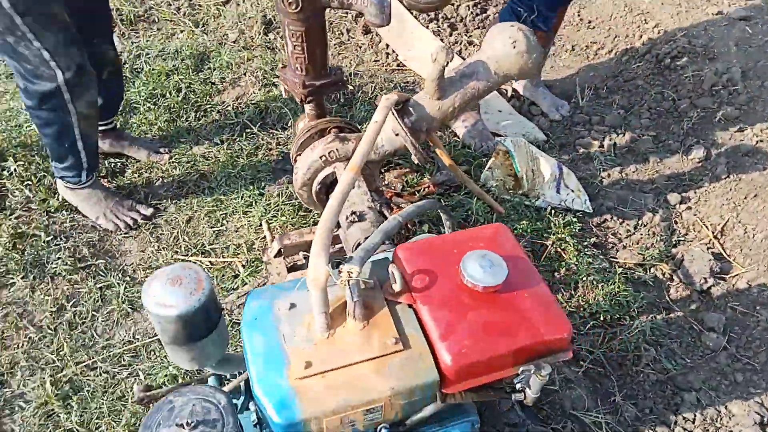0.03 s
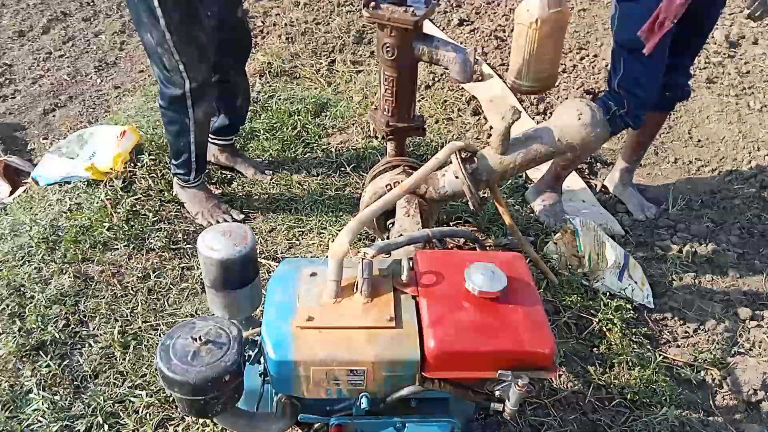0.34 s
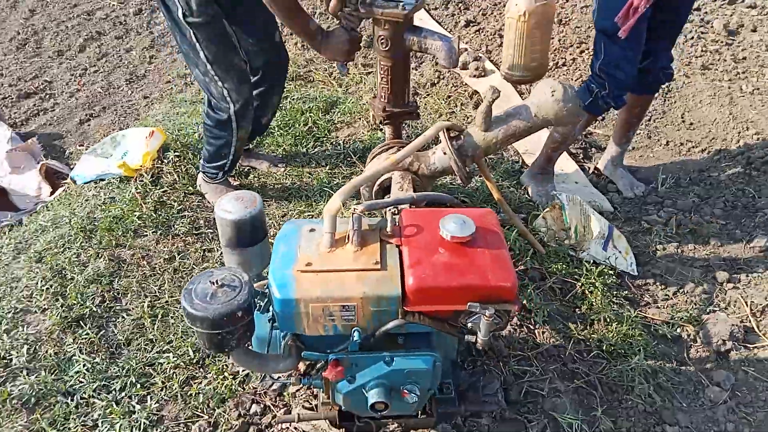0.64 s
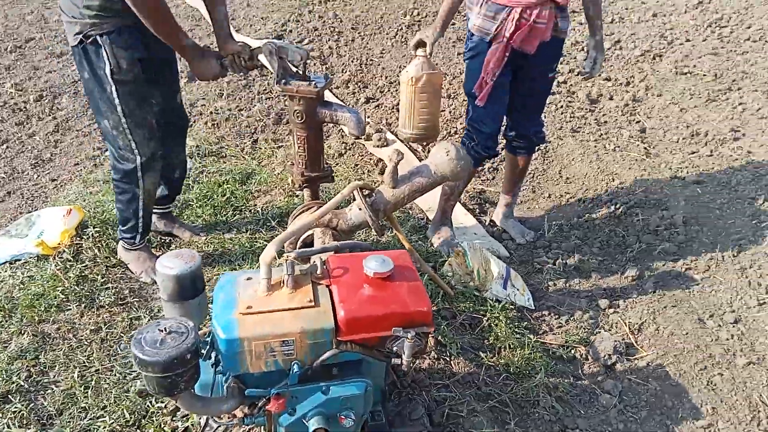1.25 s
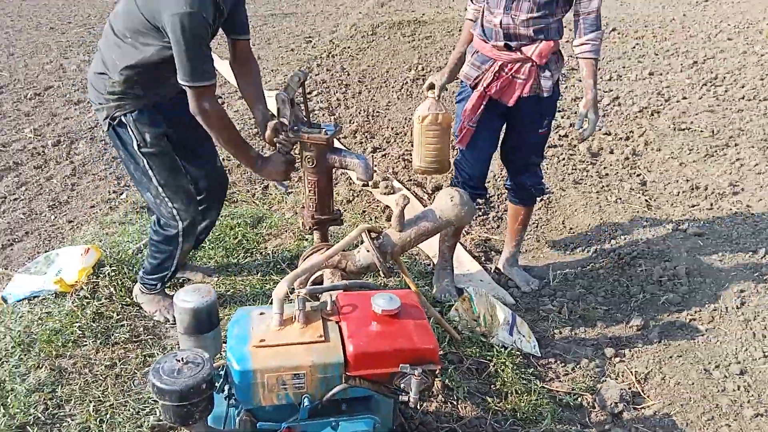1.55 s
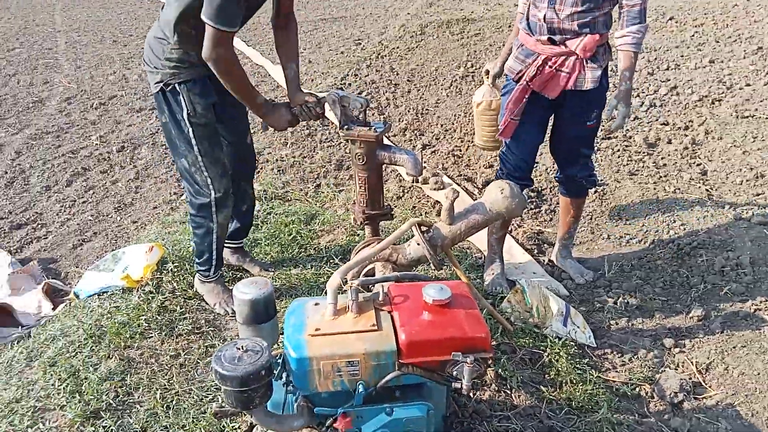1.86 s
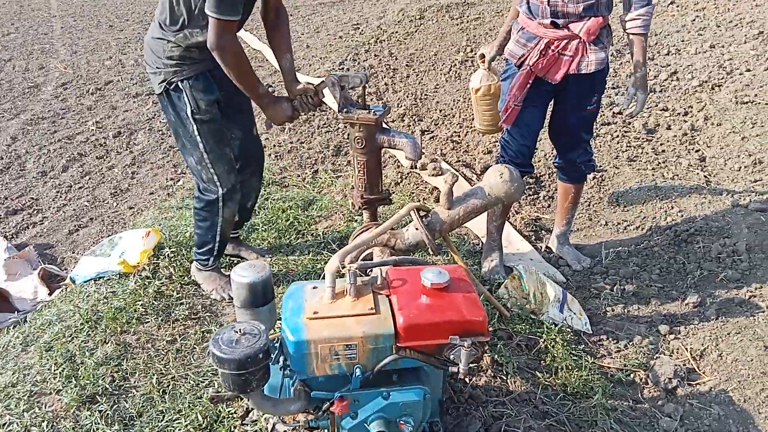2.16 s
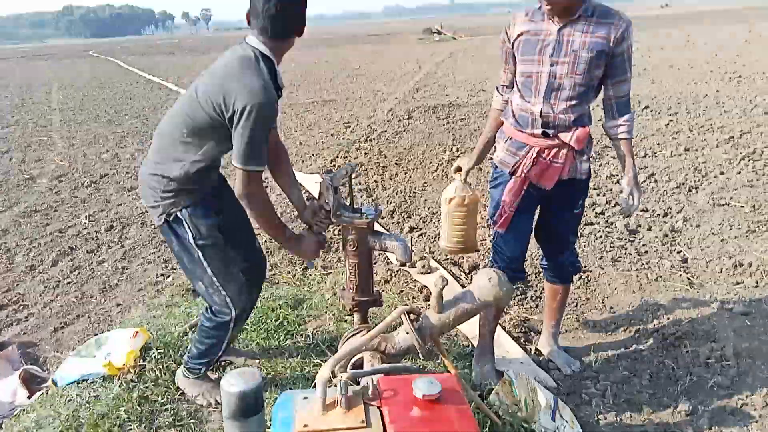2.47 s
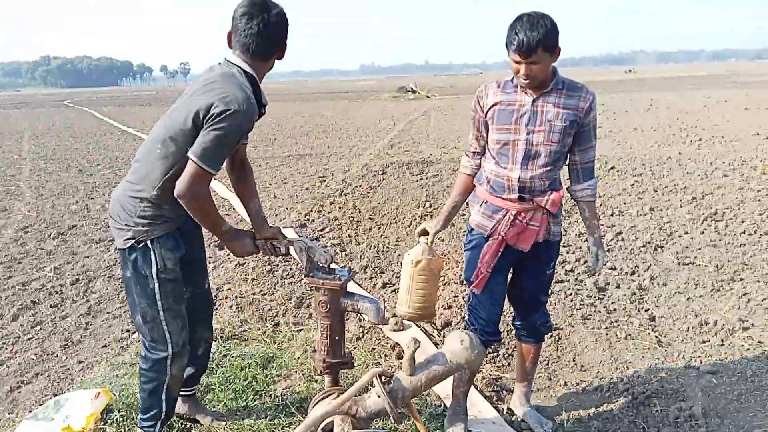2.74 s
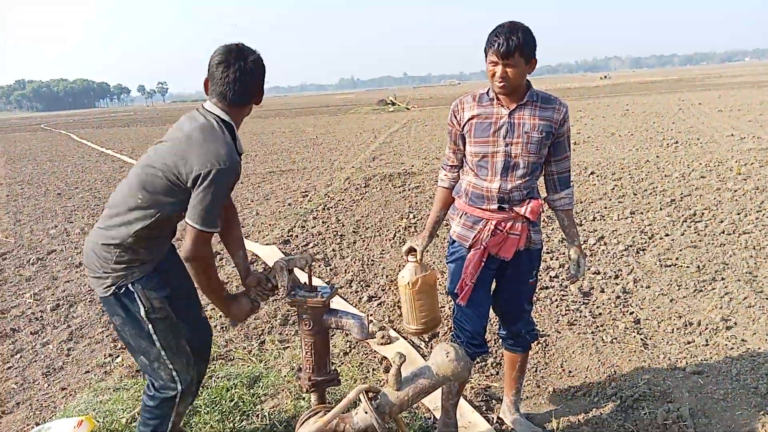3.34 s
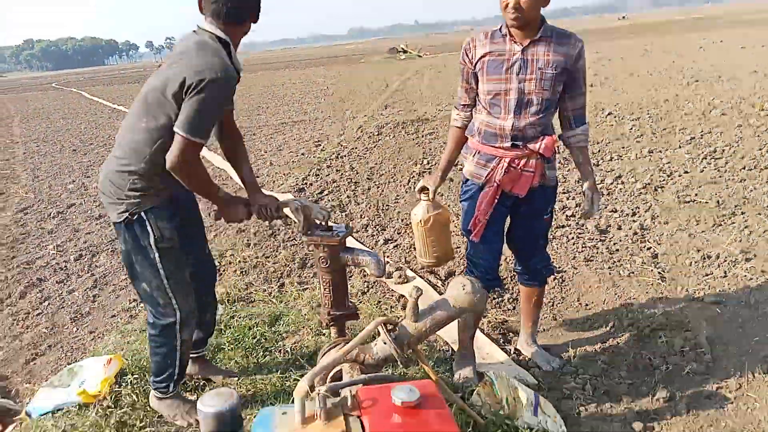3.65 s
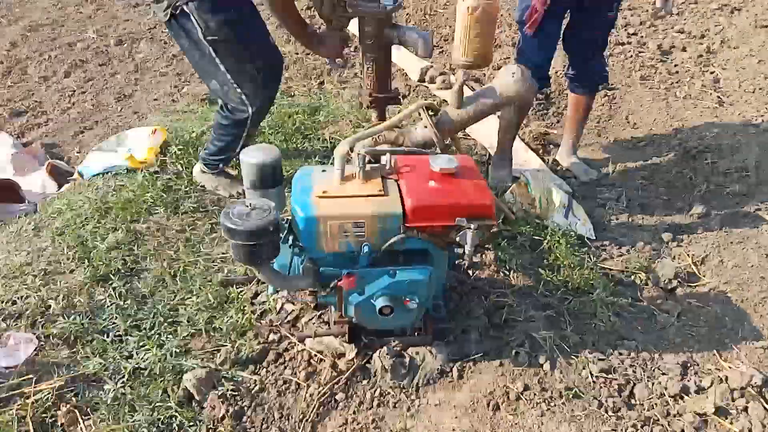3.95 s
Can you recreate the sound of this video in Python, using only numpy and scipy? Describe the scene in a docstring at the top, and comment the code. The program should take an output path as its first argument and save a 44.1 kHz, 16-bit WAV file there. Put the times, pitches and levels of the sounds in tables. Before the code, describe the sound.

A rusty hand pump clanks and squeaks in rhythm, with an engine thumping faintly far off.

```python
"""Loose pins clank close by: a rusty cast-iron hand pump, worked about twice a second in an open field.
Rust scrapes through the iron, the air in the barrel gulps at a pitch that follows the piston,
the dry pivot squeaks and the washer groans on the barrel wall.
Far off a single-cylinder engine thumps, and a little wind touches the microphone."""
import sys
import numpy as np
from scipy.fft import rfft, irfft, next_fast_len
from scipy.io import wavfile
from scipy.ndimage import map_coordinates

SR = 44100
rng = np.random.default_rng(int(sys.argv[2]) if len(sys.argv) > 2 else 0)


def generate_wav(signal):
    """Clip the signal to [-1, 1] and save it as 16-bit WAV at the path in sys.argv[1]."""
    frames = np.transpose(np.atleast_2d(signal))
    scaled = np.clip(frames, -1, 1) * 32767
    pcm = np.round(scaled).astype(np.int16)
    wavfile.write(sys.argv[1], SR, pcm)


N = 176400
T = np.arange(N) / SR


def amp(db):
    return 10 ** (np.asarray(db) / 20)


def unit(x):
    return x / np.sqrt(np.mean(x ** 2) + 1e-20)


def curve(points, at=T):
    return np.interp(at, *np.transpose(points))


def gain(colour, hz):
    """Gain at hz from (f/Hz, level/dB) points, joined on a log frequency axis."""
    f, db = np.transpose(colour)
    return amp(np.interp(np.log(hz + 1), np.log(f + 1), db))


def wobble(rate):
    """A smooth random curve, rate knots a second."""
    knots = rng.standard_normal(N // 64)
    return np.interp(T, T[::16], map_coordinates(knots, [T[::16] * rate + 2], order=2))


def filtered(x, response):
    """x through a complex frequency response."""
    size = next_fast_len(N + SR // 2)
    return irfft(rfft(x, size) * response(np.fft.rfftfreq(size, 1 / SR)), size)[:N]


def noise(colour):
    """Coloured noise of rms 1."""
    return unit(filtered(rng.standard_normal(N), lambda hz: gain(colour, hz)))


def swell(s, width):
    """A bell-shaped envelope around time s; width is its standard deviation in seconds."""
    return np.exp(-.5 * np.minimum(((T - s) / width) ** 2, 100))


def glide(s, hz, hz_per_s, waver):
    """Phase of an unsteady stick-slip tone gliding through hz at time s."""
    return 2 * np.pi * np.cumsum((hz + hz_per_s * (T - s)) * (1 + waver)) / SR


def over_stroke(points):
    """Repeats (share of the stroke, value) points with every stroke of the handle."""
    # the piston turns round at the low-pitched end of its stroke: t/s
    turns = [-.38, .07, .53, .97, 1.44, 1.92, 2.39, 2.86, 3.35, 3.81, 4.27]
    share = np.interp(T, turns, np.arange(len(turns))) % 1
    return curve(points, share)


def iron(hz, pin_db, scatter_db=5):
    """The pump's response: distinct modes on a bed of dense ones, varied a little at each call."""
    # modes of body and handle: f/Hz, t60/s, relative level/dB
    body_modes = [(874, .07, -0.5), (991, 0.11, 4), (1403, 0.17, -6), (1736, 0.023, -12.5),
                  (1898, 0.13, 3.5), (1935, 0.2, 1), (2062, 0.036, -3.5), (2230, 0.094, 1),
                  (2406, 0.062, -6.5), (3211, 0.038, 1.5), (3416, 0.027, 3), (3790, 0.05, 5),
                  (4545, 0.069, -3.5)]
    # modes of the pins: f/Hz, t60/s, relative level/dB
    pin_modes = [(4995, 0.043, 3.7), (6237, 0.043, 4), (8850, 0.16, 11.5), (9050, 0.017, 3.4),
                 (10400, 0.046, 12), (12870, 0.068, 16)]
    # overall colour of the metal: f/Hz, level/dB
    colour = [(350, 2), (600, -15.5), (858, -7.5), (1160, -7), (1880, 1), (2760, -1.5), (3680, -2),
              (4400, -2.5), (4980, -6), (6200, -10), (7520, -21), (9240, -14), (9760, -16), (13400, -25),
              (16000, -30)]
    dense_bed, detune_hz, low_edge_hz = .6, 16, 420
    modes = 0
    for centre, t60, db in body_modes + [(f, t60, db + pin_db) for f, t60, db in pin_modes]:
        strength = amp(db + scatter_db * rng.normal())
        offset_hz = hz - centre - detune_hz * rng.normal()
        modes += strength / (1 + 2j * np.pi * offset_hz * t60 / np.log(1000))
    return (dense_bed + modes) * gain(colour, hz) / np.sqrt(1 + (low_edge_hz / (hz + 1)) ** 6)


def field_rush():
    """The low rush of the open field, all around the microphone."""
    # colour of the rush: f/Hz, level/dB
    colour = [(20, -17), (45, -9), (80, 9), (150, 0), (300, -3), (550, -21), (1000, -14), (3000, -22),
              (6000, -39.5), (10000, -41), (16000, -49)]
    # its slow rise and fall: t/s, level/dB
    levels = [(0, -28), (.3, -42.5), (.6, -41), (1.2, -41.5), (2.1, -41), (2.6, -45.5), (3.1, -41),
              (3.6, -43), (4, -42)]
    return amp(curve(levels) + 2.7 * wobble(6.27) + .87 * wobble(44)) * noise(colour)


def rubbing():
    """Rust scrapes in grains through the iron, hardest around the turn of the stroke."""
    # friction of piston and pins: share of the stroke, level/dB
    friction = [(0, -43), (.15, -52.5), (.3, -44), (.5, -60), (.62, -52.5), (.78, -45), (1, -42)]
    dull_hz = 3500
    grains = rng.standard_normal(N) * amp(4.5 * wobble(260) + 2.5 * wobble(35))
    scrape = filtered(grains, lambda hz: iron(hz, pin_db=-24, scatter_db=9) / (1 + 1j * hz / dull_hz))
    return amp(over_stroke(friction)) * unit(scrape)


def clanks():
    """Loose pins close by: each blow is a chatter of rusty contacts; the top treble peaks and dies first."""
    # blows: t/s, base rise/s, then level/dB before trim in each of the four registers, low to high
    blows = [(0.003, 0.0035, -66, -30.5, -46, -46), (0.021, 0.0054, -57, -30.5, -67, -49),
             (0.037, 0.003, -40, -32.5, -37, -32.5), (0.063, 0.0023, -65, -55, -33, -36),
             (0.074, 0.002, -57, -55, -48, -41), (0.085, 0.0024, -25.5, -18, -29.5, -28.5),
             (0.099, 0.004, -34, -43, -17.5, -36), (0.109, 0.0025, -30, -22, -30, -42),
             (0.394, 0.005, -22.5, -30.5, -20, -27.5), (0.407, 0.0067, -31, -18.5, -23, -25),
             (0.442, 0.0046, -50, -34, -31.5, -42), (0.488, 0.018, -36, -28, -36, -35.5),
             (0.518, 0.002, -53, -46, -57, -36), (0.549, 0.0034, -27, -27.5, -26, -48),
             (0.573, 0.0013, -31, -39, -41, -52), (0.597, 0.003, -31.5, -33.5, -29, -47.5),
             (0.822, 0.0079, -37, -38, -47, -67), (0.856, 0.005, -33, -35, -25.5, -25),
             (0.899, 0.0035, -58, -47, -36, -43), (0.911, 0.003, -37, -35, -32, -36.5),
             (0.939, 0.0061, -26.5, -27, -29, -30), (0.99, 0.011, -21, -20.5, -24, -27),
             (1.063, 0.0018, -36.5, -27.5, -32, -47), (1.28, 0.0074, -36, -40, -45, -68),
             (1.314, 0.0031, -32.5, -29.5, -30, -29.5), (1.351, 0.012, -37, -28, -34, -43),
             (1.38, 0.0042, -35, -51, -41, -42.5), (1.406, 0.0046, -34, -39, -37.5, -35),
             (1.456, 0.0017, -23, -26.5, -23.5, -30), (1.479, 0.0089, -55, -24, -21.5, -52),
             (1.721, 0.002, -50, -41.5, -47.5, -63), (1.778, 0.006, -29.5, -31, -23.5, -29),
             (1.823, 0.013, -39, -38.5, -28.5, -33.5), (1.876, 0.012, -30, -31, -27.5, -37),
             (1.93, 0.0049, -25, -25.5, -24, -28.5), (1.958, 0.006, -24.5, -45, -36, -76),
             (1.98, 0.0025, -56, -37, -32, -51), (2.072, 0.0019, -55, -46, -43.5, -66),
             (2.142, 0.0012, -50, -44.5, -53, -58.5), (2.197, 0.03, -31.5, -40, -43, -56),
             (2.247, 0.0064, -45, -28, -31.5, -35.5), (2.263, 0.0018, -37, -41, -31.5, -40),
             (2.304, 0.003, -41, -48, -46, -56), (2.343, 0.0045, -31, -41, -33, -34.5),
             (2.403, 0.0094, -23.5, -23.5, -22, -27), (2.432, 0.0013, -34, -28.5, -29.5, -45),
             (2.634, 0.00077, -66, -51, -46.5, -64), (2.682, 0.0057, -27, -33, -37, -56.5),
             (2.738, 0.0078, -26.5, -17.5, -17, -29.5), (2.834, 0.0093, -30, -29, -25.5, -34),
             (2.87, 0.0066, -33.5, -38, -32, -49), (2.889, 0.0069, -23.5, -22, -21.5, -24.5),
             (2.918, 0.0044, -27, -25, -23.5, -52), (3.178, 0.0053, -33.5, -25.5, -33.5, -64),
             (3.212, 0.011, -37, -32, -22.5, -36), (3.226, 0.002, -30, -24.5, -37, -53),
             (3.354, 0.0047, -27, -30.5, -32, -42), (3.378, 0.0087, -32.5, -33, -37, -79),
             (3.656, 0.0017, -38.5, -45, -45, -81), (3.686, 0.0067, -25.5, -19.5, -22, -26.5),
             (3.775, 0.009, -32.5, -32.5, -38, -37.5), (3.786, 0.003, -33, -34, -32, -61),
             (3.834, 0.0039, -25.5, -23.5, -23, -26.5), (3.877, 0.0044, -48, -32.5, -35.5, -55)]
    # registers of a clank: f/Hz, factor on the rise, chatter decay/s, trim/dB
    registers = [(970, 0.76, 0.017, -3.5), (1760, 1.13, 0.0082, -2.5), (3700, 0.91, 0.009, -3),
                 (9260, 0.62, 0.0065, -2)]
    # how strongly the pins ring: t/s, level/dB
    pin_ring = [(0, -23), (.9, 1.5), (1.8, -3.5), (2.5, -15.5), (3.2, -3.5), (3.8, -18)]
    uneven_db, uneven_hz, roughness = 4.5, 170, .58
    scrape_db, scrape_s, energy_s = -15.5, .0035, .021
    size, lead = SR // 3, SR // 30
    t, hz = np.arange(size) / SR, np.fft.rfftfreq(size, 1 / SR)
    centres = np.log([row[0] for row in registers])
    bands = [np.interp(np.log(hz + 1), centres, row) for row in np.eye(len(registers))]
    scrape = amp(scrape_db) * np.exp(-t[::-1] / scrape_s)  # wraps round to lead into the blow
    out = np.zeros(N + SR)
    for s, rise, *levels in blows:
        push, grain = rng.standard_normal((2, size))
        contacts = push * np.exp(roughness * grain)
        body = iron(hz, pin_db=curve(pin_ring, s))
        # each blow has its own patchy, uneven colour
        body *= amp(uneven_db * map_coordinates(rng.standard_normal(size), [hz / uneven_hz], order=1))
        for (_, factor, decay, trim_db), band, db in zip(registers, bands, levels):
            peak_s = rise * factor
            envelope = np.minimum(t / peak_s, 1) ** .72 * np.exp(-np.maximum(t - peak_s, 0) / decay)
            force = np.roll(contacts * (envelope + scrape), lead)
            ring = irfft(rfft(force) * body * band, size)
            ring *= np.sqrt(SR * energy_s) / np.linalg.norm(ring)
            out[round(s * SR):][:size] += amp(db + trim_db) * ring
    return out[lead:][:N]


def barrel():
    """The air column gulps as the valves flap; its pitch follows the piston."""
    # resonance of the barrel: share of the stroke, f/Hz
    resonance = [(0, 245), (.14, 266), (.33, 298), (.52, 330), (.72, 303), (.83, 300), (.92, 255), (1, 245)]
    # gulps: peak t/s, relative level/dB
    gulps = [(0.01, -21.5), (0.048, -18.5), (0.115, -9), (0.15, -21.5), (0.238, -29.5), (0.319, -24),
             (0.38, -15), (0.405, -15.5), (0.585, -15), (0.614, -20.5), (0.87, -25.5), (0.928, -25.5),
             (0.965, -27), (1.021, -23.5), (1.215, -54), (1.283, -25.5), (1.322, -19), (1.409, -25.5),
             (1.491, -21), (1.686, -31), (1.749, -27.5), (1.786, -17.5), (1.888, -23.5), (1.983, -20.5),
             (2.151, -26.5), (2.217, -28.5), (2.258, -20), (2.44, -16), (2.616, -25), (2.649, -30.5),
             (2.693, -21.5), (2.749, -28), (2.849, -21.5), (2.897, -20), (2.925, -12.5), (3.176, -27.5),
             (3.223, -31.5), (3.316, -29.5), (3.386, -20.5), (3.414, -27.5), (3.646, -27), (3.799, -24),
             (3.876, -23.5)]
    rise_s, decay_s, flutter_rad = .0063, .01586, .54
    gulp_db, hollow_db = 1, -42.5
    phase = 2 * np.pi * np.cumsum(over_stroke(resonance)) / SR
    power = np.zeros(N)
    for s, db in gulps:
        tail = np.exp(1 - np.hypot(1, (T - s) / decay_s))
        power += (amp(db + gulp_db) * np.where(T < s, swell(s, rise_s), tail)) ** 2
    hollow = wobble(55) * np.sin(phase) + wobble(55) * np.cos(phase)  # faint noise at the same pitch
    return np.sqrt(power) * np.sin(phase + flutter_rad * wobble(50)) + amp(hollow_db) * hollow


def wind_puffs():
    """Light wind buffets the microphone in short, low puffs."""
    # puffs: peak t/s, width/s, level/dB
    puffs = [(0.056, 0.078, -27.5), (0.305, 0.0083, -34), (0.449, 0.027, -20.5), (0.522, 0.0085, -25.5),
             (0.554, .05, -30), (.74, 0.016, -41), (0.909, 0.07, -33.5), (1.096, 0.029, -43),
             (2.607, 0.011, -41), (3.776, 0.029, -30.5), (3.855, 0.02, -24.5)]
    # colour of the buffeting: f/Hz, level/dB
    colour = [(20, -33), (50, -16.5), (80, -3.5), (130, -6), (220, -11), (330, -10), (500, -28), (900, -72),
              (3000, -90)]
    return sum(amp(db) * swell(s, width) for s, width, db in puffs) * noise(colour)


def engine():
    """A single cylinder far across the field: one soft, low exhaust thump per firing."""
    # engine speed: t/s, firing rate/Hz
    speed = [(0, 12.7), (1.25, 14.2), (1.8, 14.3), (4, 14.12)]
    first_firing_s, thump_hz, width_s, thump_db = .05, 138, .0046, -27
    rate = curve(speed)
    cycles = np.cumsum(rate) / SR - first_firing_s * rate[0]
    t = ((cycles + .5) % 1 - .5) / rate  # time from the nearest firing
    thumps = -np.exp(-.5 * (t / width_s) ** 2) * np.cos(2 * np.pi * thump_hz * t)
    return amp(thump_db + 1.5 * wobble(11)) * thumps


def squeaks():
    """The dry pivot sticks and slips, singing briefly in mid-stroke."""
    # squeaks: peak t/s, width/s, f/Hz, glide/(Hz/s), rms level/dB of harmonics 1, 2 and 3
    slips = [(0.212, 0.014, 1161, 1307, -29, -27, -33), (0.279, 0.016, 1256, 203, -35.5, -74, -62),
             (0.682, 0.014, 1157, -300, -33.5, -29, -34.5), (0.689, 0.016, 1570, 4, -33.5, -34, -42.5),
             (0.725, 0.021, 1125, -500, -38, -35.5, -39), (1.176, 0.02, 1108, -500, -39, -47, -51),
             (1.594, 0.015, 1114, -450, -34, -37, -34), (2.083, 0.01, 1084, -3.5, -59, -62, -44.5),
             (3.036, 0.012, 1035, 0, -62, -60, -46), (2.553, 0.007, 1150, -700, -38, -52, -78),
             (3.047, 0.0077, 1160, 1496, -37, -37, -44.5), (3.51, 0.0084, 1179, 901.5, -32.5, -40.5, -46),
             (3.954, 0.0081, 1136, 800.5, -34, -40, -42)]
    # unsteadiness: t/s, share of the pitch
    jitter = [(.2, .004), (.68, .022), (.75, .006), (1.6, .003), (2.6, .004), (3, .014)]
    rasp_db = 3.2
    out, waver = np.zeros(N), curve(jitter) * wobble(500)
    for s, width, hz, hz_per_s, *levels in slips:
        near = abs(T - s) < .12
        phase = glide(s, hz, hz_per_s, waver)[near]
        levels += [levels[-1] - 10 - 7 * k for k in range(5)]  # harmonics 4 to 8 fall away
        tone = sum(amp(db + rasp_db * wobble(220)[near]) * np.sin(k * phase)
                   for k, db in enumerate(levels, 1))
        out[near] += swell(s, width)[near] * tone
    return np.sqrt(2) * out


def ticks():
    """Light, single touches of the pins in the loose linkage ring through the iron."""
    # touches: t/s, drive level/dB
    touches = [(0.361, -24), (.38, -37), (0.469, -13), (.503, -28), (1.112, -28), (1.656, -27),
               (2.286, -22), (2.495, -28), (2.562, -25.5), (2.8, -33), (3.32, -24), (3.619, -33),
               (3.64, -39)]
    decay_s, low_edge_hz = .0043, 1300
    envelope = sum(amp(db) * (T > s) * np.exp(-abs(T - s) / decay_s) for s, db in touches)
    force = envelope * rng.standard_normal(N)
    return filtered(force, lambda hz: iron(hz, pin_db=-15) * hz / (hz + low_edge_hz))


def groans():
    """The washer judders on the barrel wall as the piston sets off: a rough, rising tone."""
    # groans: peak t/s, width/s, f/Hz, level/dB
    judders = [(0.598, 0.037, 882, -38.5), (1.04, 0.023, 856, -36.5), (1.481, 0.011, 890, -27.5),
               (1.978, 0.026, 860, -29), (2.435, 0.015, 896, -32), (2.978, 0.015, 845, -31),
               (3.441, 0.022, 833, -34), (3.884, .025, 824, -37)]
    # harmonics: multiple, relative level/dB
    harmonics = [(1, 0.5), (2, 0), (3, -21), (4, -8)]
    hz_per_s, jitter, rasp_db = 1100, .034, 4
    out, waver = np.zeros(N), jitter * wobble(450)
    for s, width, hz, db in judders:
        near = abs(T - s) < .12
        phase = glide(s, hz, hz_per_s, waver)[near]
        tone = sum(amp(level) * np.sin(k * phase) for k, level in harmonics)
        out[near] += amp(db) * swell(s, width)[near] * tone
    return out * amp(rasp_db * wobble(250))


def scene():
    """One microphone beside the pump, with the engine and the field behind."""
    pump = clanks() + rubbing() + squeaks() + groans() + ticks() + barrel()
    return (pump + engine() + field_rush() + wind_puffs())[None]


def record(dry):
    """The microphone's channel passes nothing above its band limit."""
    top_hz = 15900
    return filtered(dry[0], lambda hz: hz < top_hz)[None]


dry = scene()
out = record(dry)
generate_wav(out)
```